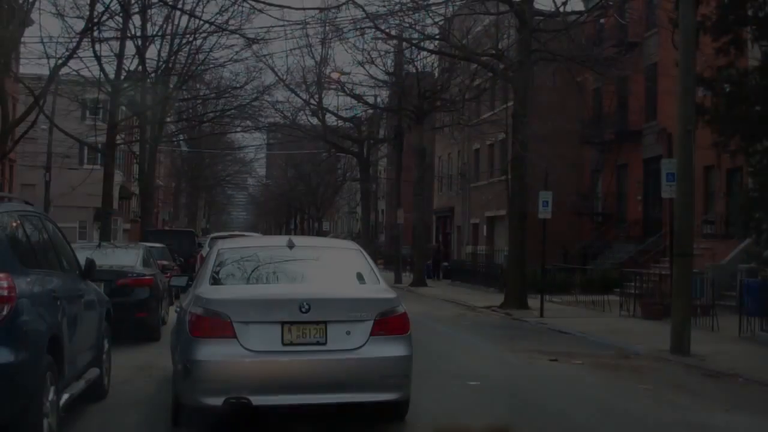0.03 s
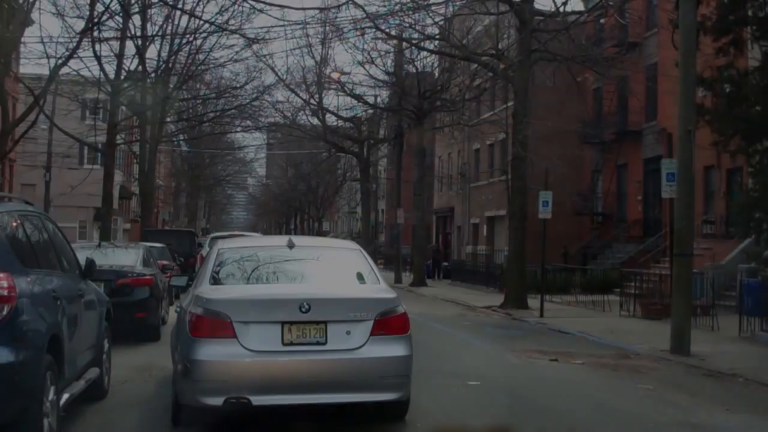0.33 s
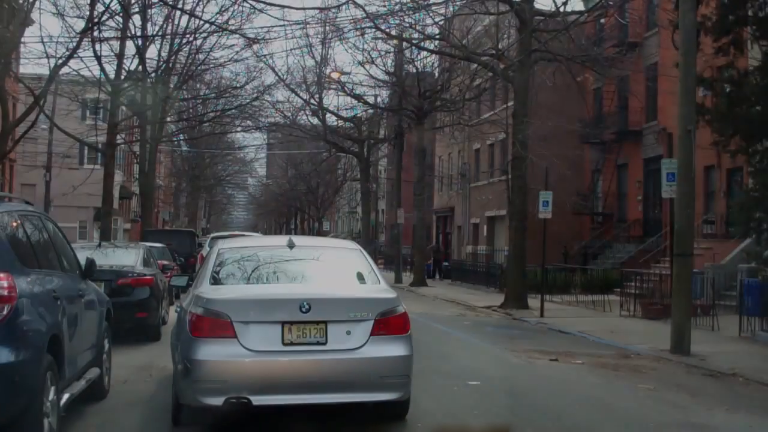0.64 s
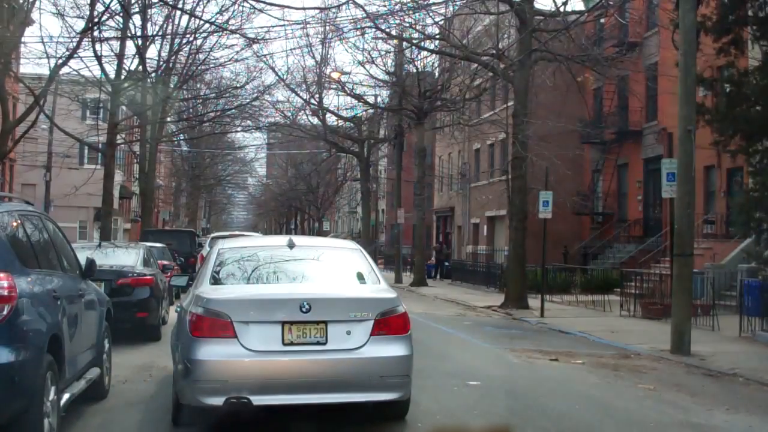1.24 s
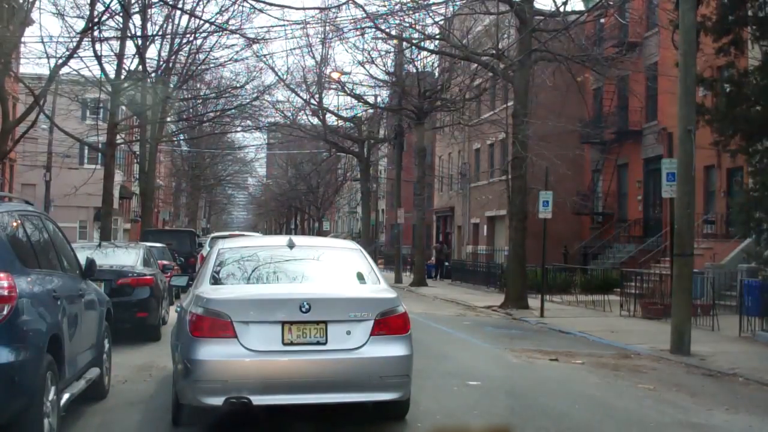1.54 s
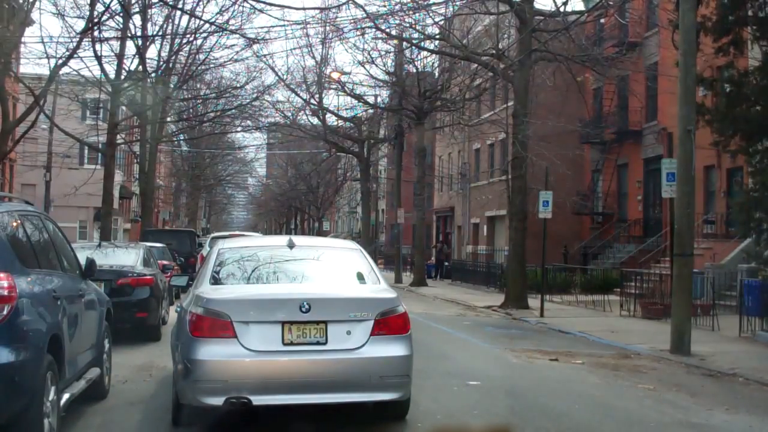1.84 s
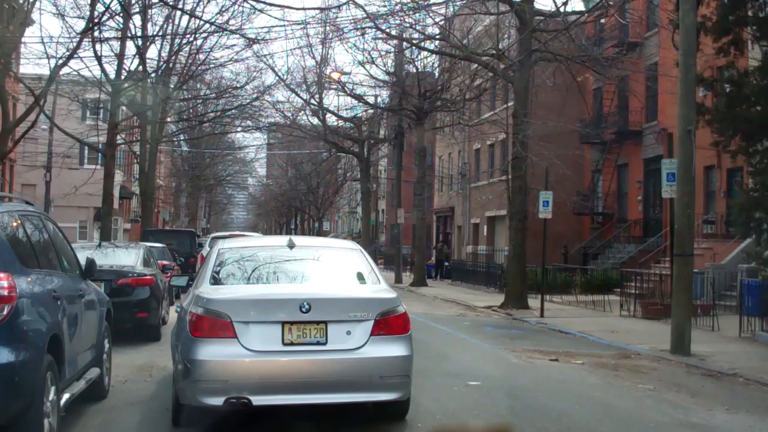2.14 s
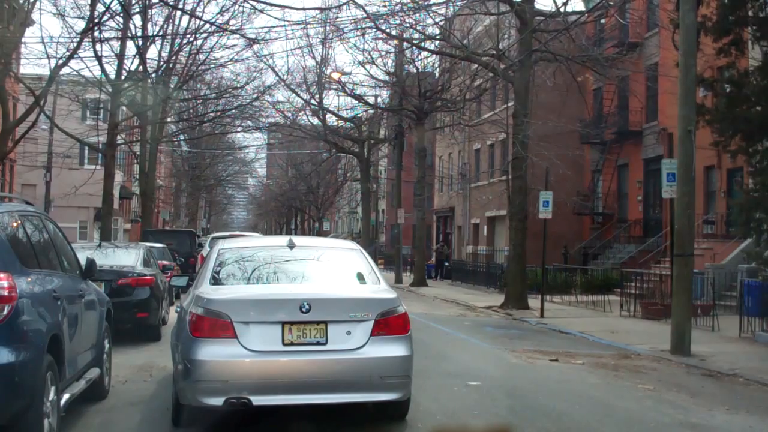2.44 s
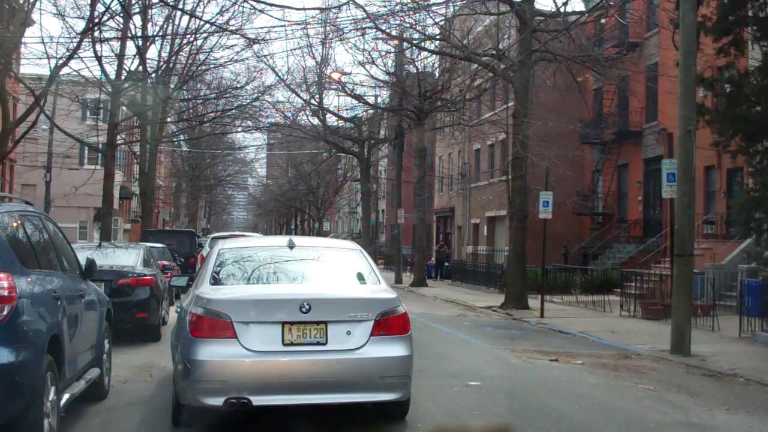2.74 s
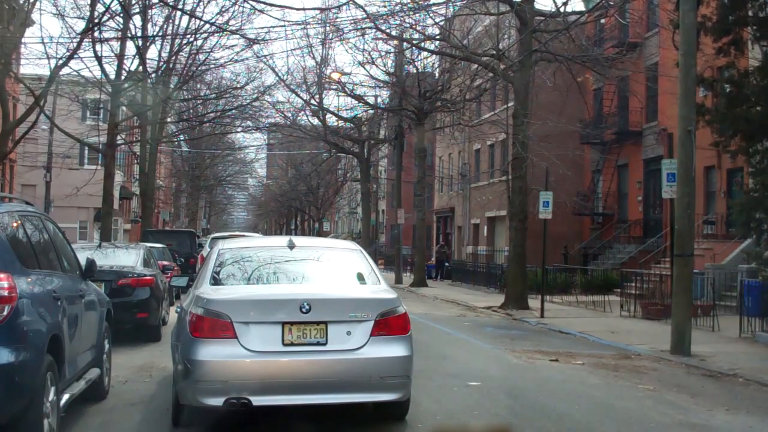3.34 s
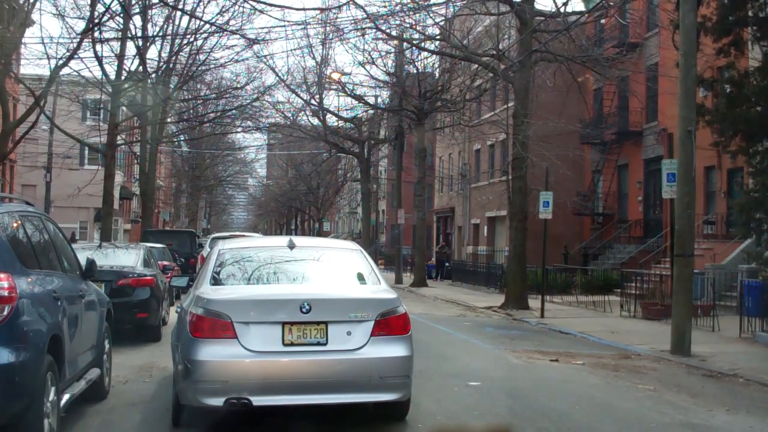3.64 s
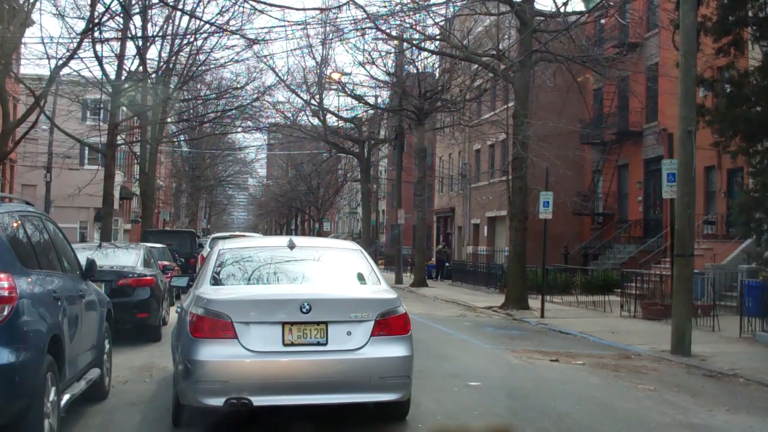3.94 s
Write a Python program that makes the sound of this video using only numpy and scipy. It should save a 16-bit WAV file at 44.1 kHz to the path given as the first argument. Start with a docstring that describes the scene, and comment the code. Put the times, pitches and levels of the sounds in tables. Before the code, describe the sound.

A street sweeper creeps along a city street, heard from on board. Its fan hums over engine throb, rushing air and hissing brooms. A brief puff of air comes early, then faint whistling spurts as the hum grows.

```python
"""A street sweeper creeps along a city street, heard from on board.
It fades in: the suction fan hums at its blade rate over the engine's throb and the body's rumble,
air roars in the duct and the brooms hiss on the asphalt. At 0.44 s a valve puffs compressed air.
From about 0.7 to 2 s a whistle spurts in the hiss, while the throb quickens and the hum grows.
The duct's ringing peaks at 2.3 s and again, lower in pitch, at 3.8 s."""
import sys
import numpy as np
from scipy import signal
from scipy.io import wavfile

SR = 44100
rng = np.random.default_rng(int(sys.argv[2]) if len(sys.argv) > 2 else 0)


def int16_out(signal):
    """Quantize to a 16-bit WAV file."""
    q = np.round(np.clip(np.atleast_2d(signal).T, -1, 1) * 32767)
    wavfile.write(sys.argv[1], SR, q.astype(np.int16))


N = 176400
T = np.arange(N) / SR


def from_db(db):
    return 10 ** (np.asarray(db) / 20)


def unit_rms(x):
    return x / np.sqrt(np.mean(x ** 2, axis=-1, keepdims=True) + 1e-20)


def in_time(curve):
    return np.interp(T, *np.transpose(curve))


def at_hz(spectrum, hz):
    freqs_hz, values = np.transpose(spectrum)
    return np.interp(np.log(hz), np.log(freqs_hz), values)


def drift(rate_hz):
    """Slow random motion, rms 1."""
    pole = np.exp(-2 * np.pi * rate_hz * 40 / SR)  # one step per 40 samples
    white = rng.standard_normal(N // 40 + 2002)
    slow = signal.lfilter([1], [1, -2 * pole, pole * pole], white)[2000:]
    return np.interp(np.arange(N) / 40, np.arange(len(slow)), unit_rms(slow))


def swell(peak_s, rise_s, fall_s):
    """Gaussian surge with separate rise and fall."""
    return np.exp(-.5 * ((T - peak_s) / np.where(T < peak_s, rise_s, fall_s)) ** 2)


def place(x, pan_db=0, lag_s=.00017):
    """Stereo position: pan is left minus right; the left side lags."""
    left, right = np.broadcast_to(x, (2, N))
    left = np.interp(T - round(lag_s * SR) / SR, T, left)
    return np.array([left * from_db(pan_db / 2), right * from_db(-pan_db / 2)])


# Left-right coherence: f/Hz, ratio
COHERENCE = [(1000, 1), (1600, 0.99), (2500, 0.3), (8000, 0.13), (12000, 0.073)]
def stereo_pair(mid, side, hz):
    """Two noises become left and right, less alike towards the treble."""
    alike = at_hz(COHERENCE, hz)
    return np.sqrt(1 + alike) * mid + np.sqrt(1 - alike) * side * np.array([[1], [-1]])


def banded_noise(left_db, right_db, flicker_db):
    """Third-octave noise bands, each flickering on its own; rms 1 a side."""
    edges_hz = 22 * 2 ** (np.arange(30) / 3)
    out, white = 0, rng.standard_normal((2, 2, N))
    for k, (low, high) in enumerate(zip(edges_hz, edges_hz[1:])):
        hz = np.sqrt(low * high)
        flicker = from_db(flicker_db * drift(14.4))
        if high > left_db[0][0] and low < left_db[-1][0]:
            bandpass = signal.butter(2, [low, high], "band", fs=SR, output="sos")
            mid, side = signal.sosfilt(bandpass, white[k % 2])
            gain = from_db([[at_hz(left_db, hz)], [at_hz(right_db, hz)]])
            out = out + gain * flicker * stereo_pair(mid, side, hz)
    return unit_rms(out)


def ringing_noise(hz, width_hz, pan_db):
    """Stereo noise through one narrow resonance, shimmering in level."""
    b, a = signal.iirpeak(hz, hz / width_hz / 2, fs=SR)
    white = rng.standard_normal((2, N))
    mid, side = signal.lfilter(b, a, signal.lfilter(b, a, white))
    shimmer = from_db(0.74 * drift(rate_hz=9))
    return place(unit_rms(shimmer * stereo_pair(mid, side, hz)), pan_db, lag_s=0)


def swelling_bands(rows):
    """Resonances that each rise to a peak and die away."""
    return sum(from_db(db) * swell(peak_s, 0.83 * fall_s, fall_s) * ringing_noise(hz, width_hz, pan_db)
               for peak_s, fall_s, hz, width_hz, db, pan_db in rows)


def partial(cycles, db, waver, rate_hz):
    """Sine wavering randomly in level and phase."""
    angle = 2 * np.pi * (cycles + rng.random())
    in_phase = (1 + waver * drift(rate_hz)) * np.sin(angle)
    quadrature = waver * drift(rate_hz) * np.cos(angle)
    return np.sqrt(2 / (1 + 2 * waver ** 2)) * from_db(db) * (in_phase + quadrature)


def cab_reflections(x, gain_db=-18.5, first_s=.001, last_s=.016):
    """Eight echoes a side off cab and body give noise a hollow ripple; rms 1."""
    lags = (rng.uniform(first_s, last_s, size=(8, 2)) * SR).astype(int)
    upper = signal.sosfilt(signal.butter(2, 600, "high", fs=SR, output="sos"), x)
    echoes = sum(np.array([np.roll(side, lag) for side, lag in zip(upper, pair)]) for pair in lags)
    return unit_rms(x + from_db(gain_db) * echoes)


# Blade harmonics 1-4: t/s, level/dB
FAN_H1_DB = [(0, -33.5), (.45, -31.5), (.75, -28), (1, -22), (1.72, -18.5), (2.1, -20), (2.45, -24),
             (2.95, -24.5), (3.55, -30.5), (3.8, -25.5), (4, -22.5)]
FAN_H2_DB = [(0, -52), (.17, -43), (.65, -35), (.98, -37.5), (1.27, -32), (1.55, -33), (1.75, -30),
             (2.15, -27), (2.42, -29.5), (2.85, -29), (3.1, -26.5), (3.5, -31.5), (4, -34.5)]
FAN_H3_DB = [(0, -56.5), (.8, -44), (1.35, -46.5), (1.53, -37.5), (1.8, -44), (2.9, -48.5), (3.38, -34.5),
             (3.6, -47)]
FAN_H4_DB = [(0, -58), (1.92, -49), (2.1, -44), (2.7, -51), (4, -55)]
def fan_hum(blade_cycles):
    """Passing blades sound four harmonics, the first the steadiest."""
    first = partial(blade_cycles, in_time(FAN_H1_DB), waver=0.01, rate_hz=13)
    second = partial(2 * blade_cycles, in_time(FAN_H2_DB), waver=0.16, rate_hz=5.4)
    third = partial(3 * blade_cycles, in_time(FAN_H3_DB), waver=0.24, rate_hz=9.5)
    fourth = partial(4 * blade_cycles, in_time(FAN_H4_DB), waver=0.23, rate_hz=8.1)
    return place(first, pan_db=1.5) + place(second) + place(third + fourth, pan_db=2)


# Fan overtone: multiple of blade rate, pre-fade level/dB
OVERTONE_DB = [(5, -54.5)]
# Shaft orders: multiple of shaft rate, pre-fade level/dB
SHAFT_ORDERS_DB = [(4, -53), (5, -42.5), (7, -46.5), (8, -43)]
def fan_growl(blade_cycles, blades=6):
    """Unequal blades add unsteady shaft orders below a faint, wavering overtone."""
    overtone = sum(partial(k * blade_cycles, db, waver=0.52, rate_hz=2.9) for k, db in OVERTONE_DB)
    shaft_turns = blade_cycles / blades
    orders = sum(partial(k * shaft_turns, db, waver=0.78, rate_hz=6.5) for k, db in SHAFT_ORDERS_DB)
    return place(overtone, pan_db=2) + place(orders, pan_db=1.5)


# Throb rate: t/s, f/Hz
BEAT_HZ = [(0, 2.7), (.8, 2.85), (1.1, 3.35), (4, 3.53)]
def engine(firing_cycles, beat_peak_s=2.03):
    """Firing tone and its octave; a slightly lower vibration beats against the tone."""
    angle = 2 * np.pi * firing_cycles
    beats = np.cumsum(in_time(BEAT_HZ)) / SR
    beat_angle = 2 * np.pi * (beats - np.interp(beat_peak_s, T, beats))
    throb = np.sqrt(2) * (from_db(-34.5) * np.sin(angle) + from_db(-42) * np.sin(angle - beat_angle))
    octave = partial(2 * firing_cycles, db=-42, waver=0.27, rate_hz=3.5)
    return place(throb + octave, pan_db=3.5)


# Rumble spectral density: f/Hz, relative level/dB
RUMBLE_SPECTRUM_DB = [(25, -22), (50, -8.5), (85, -2.5), (145, 2), (190, -1.5), (260, -2.5), (420, -11.5),
                      (600, -20)]
def body_rumble():
    """The body vibrates with low, flickering noise."""
    rumble = banded_noise(RUMBLE_SPECTRUM_DB, RUMBLE_SPECTRUM_DB, flicker_db=1.45)
    return place(from_db(-34) * rumble, pan_db=4.5)


# Roar spectral density: f/Hz, relative level/dB
ROAR_SPECTRUM_DB = [(300, -12), (450, -2.5), (620, -1.5), (820, 1.5), (1150, -3.5), (1450, -4.5),
                    (1900, -11.5), (3000, -18)]
# Roar envelope: t/s, pre-fade level/dB
ROAR_DB = [(0, -38.5), (.8, -39.5), (4, -36)]
def duct_roar():
    """Air rushes through the suction duct."""
    air = banded_noise(ROAR_SPECTRUM_DB, ROAR_SPECTRUM_DB, flicker_db=1.3)
    return place(from_db(in_time(ROAR_DB)) * cab_reflections(air), pan_db=4)


# Hiss spectral density per side: f/Hz, relative level/dB
HISS_LEFT_DB = [(1200, -21), (2200, 0.5), (4200, -0.5), (6400, -2.5), (9000, -8.5), (14000, -11)]
HISS_RIGHT_DB = [(1200, 1), (2200, 2.5), (4000, -0.5), (8000, -1), (14000, 1)]
# Hiss envelope: t/s, pre-fade level/dB
HISS_DB = [(0, -39), (.9, -42), (2.3, -37.5), (4, -38.5)]
# Hiss resonances: peak t/s, fall/s, f/Hz, nominal width/Hz, pre-fade level/dB, pan/dB
HISS_RESONANCES = [(0.17, .6, 8930, 540, -48.5, -4), (1.2, 0.38, 9000, 260, -48.5, -6),
                   (1.382, 0.34, 9600, 518.4, -47.5, -9), (1.4, 2.9, 4400, 80, -52.5, -1),
                   (1.7, .6, 3930, 101.9, -50.5, 6), (2.2, 1.3, 4320, 185.2, -50, 8),
                   (1.852, 1.1, 4790, 102, -52, -4), (2.2, 1.1, 5390, 110, -53, -10),
                   (3.27, 0.42, 6230, 302.4, -46, -4), (3.42, 0.52, 7140, 561.6, -53, -17),
                   (3.7, 0.21, 6500, 600, -43.5, -2), (4.02, 0.35, 8500, 750, -45.5, -13),
                   (3.4, 1.9, 13950, 864, -48.5, -13.5)]
def brooms():
    """Bristles hiss on asphalt; ringing bands come and go."""
    bristles = cab_reflections(banded_noise(HISS_LEFT_DB, HISS_RIGHT_DB, flicker_db=1))
    hiss = from_db(in_time(HISS_DB)) * bristles
    return place(hiss, pan_db=-2.5) + place(swelling_bands(HISS_RESONANCES))


# Puff spectral density per side: f/Hz, relative level/dB
PUFF_LEFT_DB = [(1100, 3), (7000, -1), (12000, -8)]
PUFF_RIGHT_DB = [(1100, 6), (3500, 1), (14000, 2)]
# Nozzle resonances: f/Hz, nominal width/Hz, level/dB, pan within the puff/dB
NOZZLE_RESONANCES = [(1360, 360, -40, 2), (6550, 420, -50, 11), (13750, 800, -45.5, -12)]
def air_puff(start_s=0.44, attack_s=0.077, hold_s=0.056, release_s=0.042):
    """A valve lets off compressed air through a ringing nozzle."""
    envelope = np.interp(T, start_s + np.cumsum([0, attack_s, hold_s, release_s]), [0, 1, 1, 0])
    air = from_db(-37) * banded_noise(PUFF_LEFT_DB, PUFF_RIGHT_DB, flicker_db=1)
    nozzle = sum(from_db(db) * ringing_noise(hz, width_hz, pan_db)
                 for hz, width_hz, db, pan_db in NOZZLE_RESONANCES)
    return place(envelope * (air + nozzle), pan_db=-2)


# Whistle spurts: peak t/s, fall/s, pre-fade level/dB
SPURTS = [(.76, .17, -53), (1.1, .09, -52), (1.43, .05, -46), (1.62, .06, -47.5), (1.85, 0.2, -49)]
def whistle(rise_s=0.049):
    """One narrow band of the hiss rings in spurts."""
    envelope = sum(from_db(db) * swell(peak_s, rise_s, fall_s) for peak_s, fall_s, db in SPURTS)
    return place(envelope * ringing_noise(hz=4480, width_hz=65, pan_db=7.5))


# Duct resonances: peak t/s, fall/s, f/Hz, nominal width/Hz, pre-fade level/dB, pan/dB
DUCT_RESONANCES = [(2.3, 1, 1197, 130, -47, 2.5), (3.8, .3, 844, 50, -44.5, 3)]
def duct_ringing():
    """The airflow sets the duct ringing in two swells."""
    return place(swelling_bands(DUCT_RESONANCES))


# Blade-pass rate: t/s, f/Hz
BLADE_HZ = [(0, 171.8), (.8, 173.9), (1.7, 171.4), (2.4, 170.7), (4, 171.1)]
# Fade-in: t/s, level/dB
FADE_DB = [(.2, -5), (.55, -1.2), (1.3, 1.5)]
def scene():
    """Fan and engine run at a fixed speed ratio; hum and puff bypass the fade."""
    blade_cycles = np.cumsum(in_time(BLADE_HZ)) / SR
    machine = engine(firing_cycles=.2883 * blade_cycles) + body_rumble() + fan_growl(blade_cycles)
    machine += duct_roar() + duct_ringing() + brooms() + whistle()
    return fan_hum(blade_cycles) + air_puff() + from_db(in_time(FADE_DB)) * machine


def record(dry):
    """Steep low-pass on the top treble."""
    cutoff_hz = 14250
    return signal.sosfilt(signal.ellip(12, .1, 90, cutoff_hz, fs=SR, output="sos"), dry)


dry = scene()
out = record(dry)
int16_out(out)
```